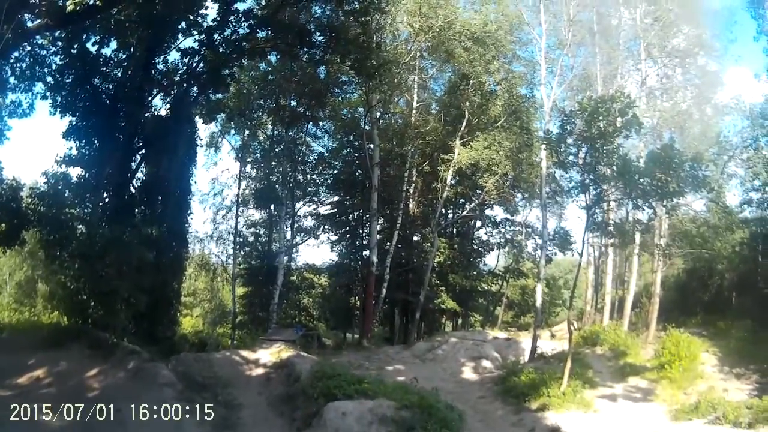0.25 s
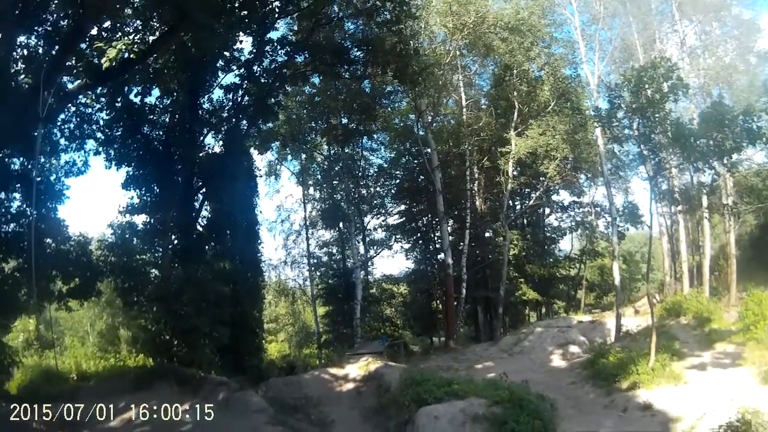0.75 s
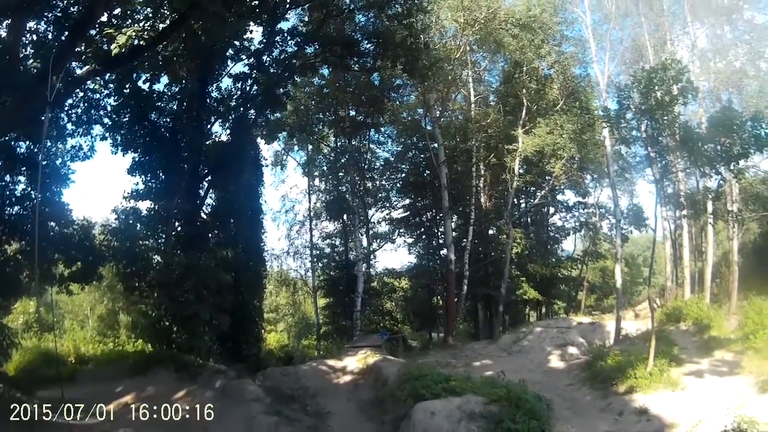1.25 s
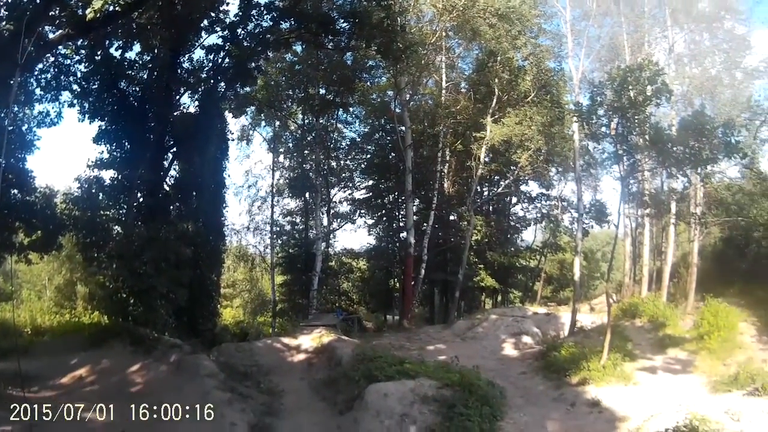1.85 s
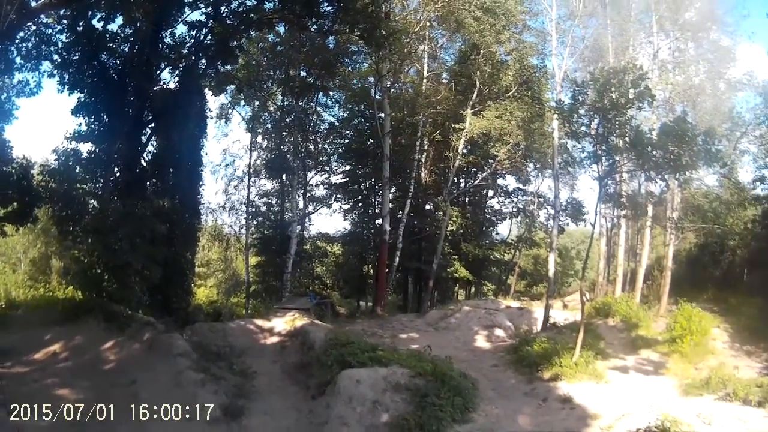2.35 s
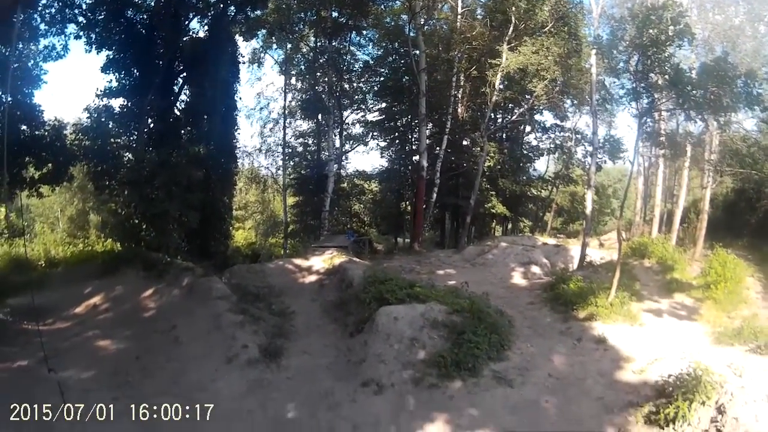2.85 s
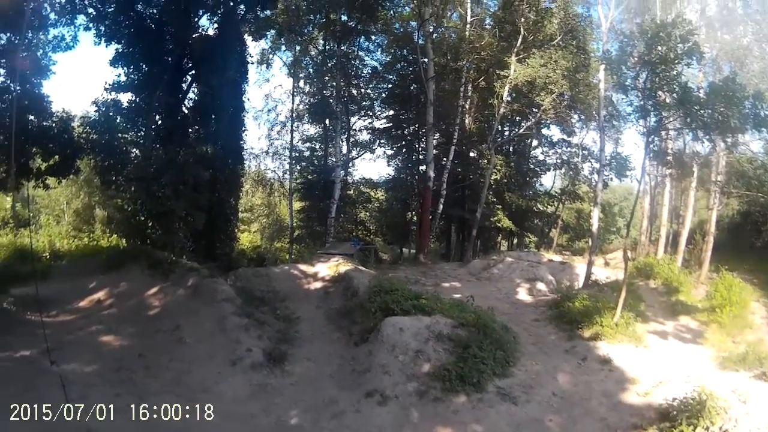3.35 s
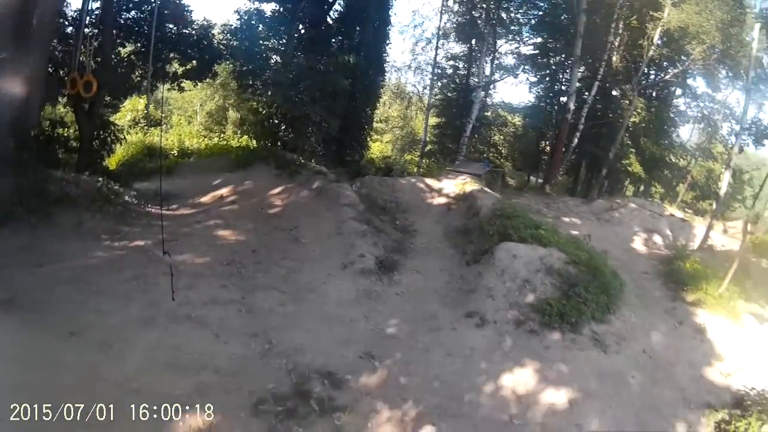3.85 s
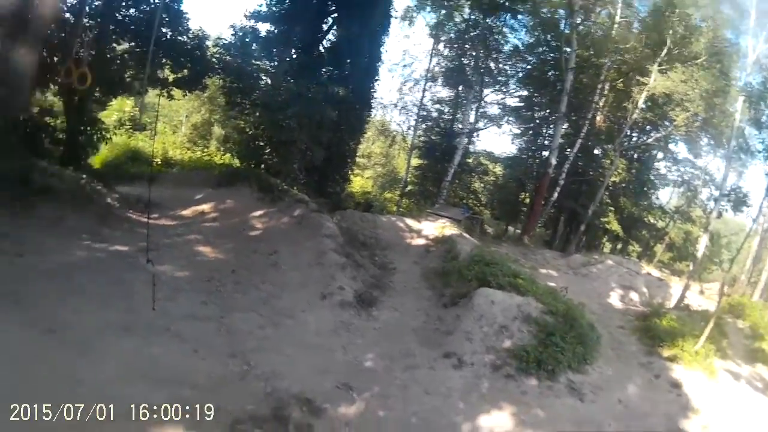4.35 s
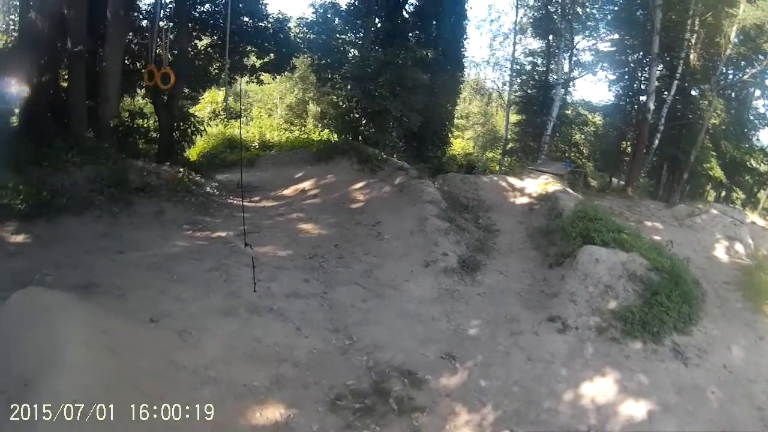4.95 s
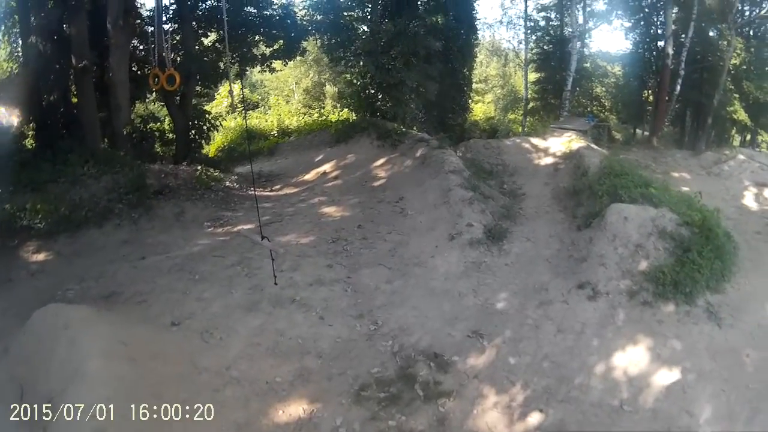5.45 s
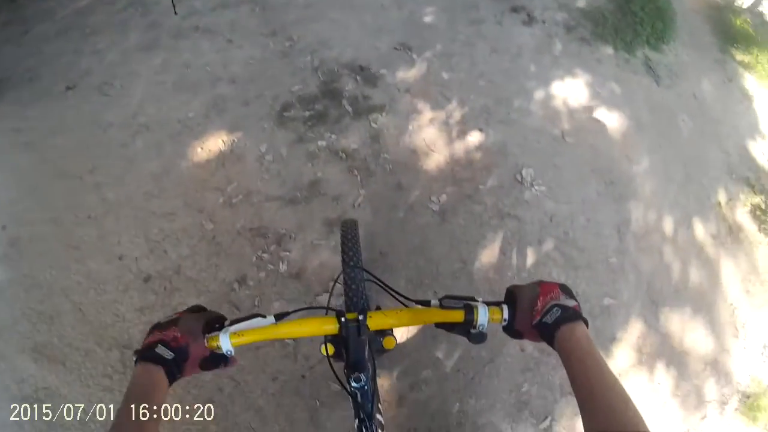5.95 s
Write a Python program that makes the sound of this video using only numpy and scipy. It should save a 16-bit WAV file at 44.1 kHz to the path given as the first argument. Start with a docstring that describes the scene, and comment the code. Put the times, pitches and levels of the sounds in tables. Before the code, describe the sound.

Loose plastic camera housing thumps, knocks, snaps and rubs on its mount in irregular bursts, over thin electronic hiss and very faint birds.

```python
"""Jolts and knocks of a closed plastic helmet housing, microphone inside, while a rider waits astride a bike.
Each movement on this forest trail swings the housing on its mount (low thumps ringing down) and makes its
joints knock, snap and rub: short noisy forces ring the modes of the shell, lumpy pushes sway the mount.
Beneath lie shaped noise and a throbbing tone from the electronics, and a narrow hiss once a second;
far off among the trees a few birds whistle, as short sliding tones."""
import sys
import numpy as np
from scipy import signal
from scipy.fft import rfft, irfft
from scipy.io import wavfile
from scipy.ndimage import uniform_filter1d

SR = 44100
rng = np.random.default_rng(int(sys.argv[2]) if len(sys.argv) > 2 else 0)


def undo_db(level):
    """Turn decibels back into plain size, where 20 dB means ten times bigger."""
    steps = np.asarray(level, float) / 20
    return 10 ** steps


def to_wav(s):
    """Save 16-bit WAV."""
    ch = np.atleast_2d(s).T  # columns
    pcm = np.round(np.clip(ch, -1, 1) * 32767)  # PCM
    wavfile.write(sys.argv[1], SR, pcm.astype(np.int16))


N = 273861   # length in samples

# Movement of the head, as the sway of the mount. Each row: time in seconds, level in dB.
HEAD_MOVEMENT = [(0, -40.5), (0.3, -62), (0.65, -40), (0.88, -46), (1.2, -54.5), (1.35, -46.5),
                 (1.57, -53.5), (1.7, -45), (2.05, -41.5), (2.22, -55), (2.36, -46), (2.901, -63),
                 (3.6, -45.5), (3.78, -53.5), (4.2, -53), (4.36, -41.5), (4.85, -47.5), (5.0, -40.5),
                 (5.3, -49), (5.4, -36), (5.51, -62), (5.649, -46), (6.101, -64.5)]
# Modes of the mount. Each row: frequency in Hz, width in Hz, relative gain in dB.
MOUNT_MODES = [(36, 31, -4), (85, 23.6, -1), (130.4, 33.6, -4.5), (243.7, 38, -14.5)]
# Modes of the plastic shell. Each row: frequency in Hz, width in Hz, relative gain in dB.
SHELL_MODES = [(240.7, 65, 11.5), (573, 144, 7.5), (842, 120, 1), (1364, 305, 6.5), (1933, 262, 3.5),
               (2242, 232, -2.5), (2840, 530, -11.5), (3680, 990, -8), (4820, 1440, -13), (5800, 1430, -17),
               (7800, 770, -29.5), (12000, 2900, -31)]
# Colour of the electronic hiss. Each row: frequency in Hz, relative density in dB per Hz.
HISS_COLOUR = [(150, 14.5), (500, 6.5), (2000, -2.5), (5000, -5.5), (13000, -8), (15500, -11.5)]
# Knocks in the joints. Each row: time in seconds, hollow knock in dB, bright snap in dB, contact length in ms.
JOINT_KNOCKS = [(0.046, -51, -47, 3), (0.27, -53, -58, 5), (0.3958, -23.5, -43, 4.9),
                (0.476, -36, -45, 1.9), (0.4925, -41, -35.5, 10.8), (0.626, -36, -52, 5),
                (0.6374, -37.5, -40.5, 0.51), (0.6786, -18.5, -33, 4.8), (0.7068, -31, -45, 7),
                (0.724, -38, -45, 7.8), (0.7584, -31, -40.5, 0.73), (0.78, -34.5, -44, 2.2),
                (0.8178, -26.5, -40.5, 5.8), (0.845, -28, -40.5, 0.17), (1.107, -47, -60, 2.5),
                (1.1791, -45.5, -66, 2.5), (1.306, -33.5, -60, 9.5), (1.3203, -33.5, -55, 10.2),
                (1.3969, -39.5, -63, 3.1), (1.474, -44.5, -54, 2.7), (1.5025, -42, -64, 3.8),
                (1.605, -16, -35.5, 8.8), (1.6275, -19.5, -59, 5.1), (1.6345, -18.5, -22, 0.93),
                (1.6585, -33.5, -48, 3.6), (1.6985, -37, -33.5, 3.6), (1.709, -44, -43.5, 2),
                (1.7441, -43, -58, 12.6), (1.8697, -42, -54, 7.4), (1.9186, -43, -44, 5.4),
                (1.961, -38.5, -42, 0.63), (2.002, -32, -41, 0.29), (2.021, -41.5, -52, 5.5),
                (2.0867, -27.5, -30.5, 2.4), (2.1102, -34, -31.5, 5.2), (2.1475, -28.5, -42, 1.14),
                (2.3172, -35.5, -35, 8.5), (2.399, -48, -60, 2.2), (2.4666, -42.5, -54.5, 4.7),
                (2.6431, -28.5, -89, 12), (2.654, -31.5, -31.5, 1.2), (2.662, -30, -29, 7.4),
                (2.6792, -32, -39.5, 0.22), (2.7821, -41.5, -50.5, 2.8), (3.1194, -39, -46, 0.44),
                (3.269, -41.5, -51, 3.8), (3.284, -39, -57, 5.7), (3.299, -45.5, -51.5, 3.9),
                (3.3932, -31, -32.5, 2.9), (3.4252, -16.5, -42, 6), (3.5447, -35.5, -39, 1.3),
                (3.567, -27, -43, 24), (3.5794, -30, -45, 3.4), (3.5904, -23, -35, 4.2),
                (3.6248, -26.5, -29.5, 0.43), (3.95, -51, -91, 62), (4.1153, -48.5, -58.5, 12),
                (4.2672, -31, -31, 0.5), (4.2742, -30.5, -48, 1.9), (4.3205, -28.5, -30.5, 5.8),
                (4.3298, -28.5, -39.5, 11.4), (4.372, -24.5, -38.5, 7.9), (4.4772, -27, -36, 4.9),
                (4.5235, -30, -41, 5.3), (4.5388, -29.5, -41.5, 3.2), (4.6258, -20.5, -33.5, 4.1),
                (4.6335, -22.5, -37, 1.75), (4.7146, -32.5, -38, 0.25), (4.7795, -27.5, -37, 3.8),
                (4.786, -22, -35.5, 2.66), (4.8905, -39, -109, 13), (4.9439, -26, -36, 0.77),
                (4.9556, -37, -41.5, 19), (4.9826, -25, -41, 7.2), (5.0381, -11.5, -26.5, 6.1),
                (5.075, -29.5, -43, 16), (5.108, -37.5, -42, 1.1), (5.1478, -40, -41, 2.9),
                (5.1515, -32.5, -34.5, 1.5), (5.2765, -39, -51.5, 8.5), (5.3445, -55, -52, 2),
                (5.3726, -34, -65, 6.8), (5.4079, -34, -48, 0.93), (5.4425, -51, -48, 2.2),
                (5.469, -48, -65, 8.9), (5.5524, -40.5, -60, 2.3), (5.5735, -32, -44.5, 11.5),
                (5.601, -43, -50.5, 4.2), (5.6276, -38.5, -55, 1.1), (5.6562, -39.5, -69, 5.1),
                (5.7619, -32.5, -56, 4.3), (5.7806, -40, -50, 10.4), (5.9538, -23, -35.5, 5.1)]
# Jolts of the housing on its springy mount. Each row: time of the widest swing in seconds, peak level in dB,
# pitch at the widest swing in Hz, time to fall by 60 dB in seconds.
MOUNT_JOLTS = [(0.126, -34.5, 115, 0.14), (0.404, -28, 142, 0.029), (0.478, -20, 73, 0.074),
               (0.591, -26.5, 71, 0.068), (0.691, -31, 135, 0.029), (1.392, -36.5, 102, 0.16),
               (1.516, -33.5, 97, 0.1), (1.615, -13.5, 98.5, 0.14), (1.638, -7, 97, 0.099),
               (1.759, -32, 98, 0.1), (1.945, -28, 109, 0.099), (1.982, -28, 112, 0.029),
               (2.073, -20.5, 97, 0.035), (2.646, -15.5, 179, 0.013), (2.654, -17, 82, 0.077),
               (3.105, -36, 87.5, 0.09), (3.388, -25.5, 100, 0.063), (3.441, -17.5, 92.5, 0.12),
               (3.584, -12, 83, 0.1), (4.276, -15.0, 76.6, 0.11), (4.336, -22.5, 95, 0.15),
               (4.955, -17, 96.3, 0.057), (5.013, -18.5, 82, 0.27), (5.339, -27.5, 93, 0.061),
               (5.384, -30, 94.3, 0.19), (5.96, -26, 91, 0.12)]
# Narrow hiss that the electronics give once a second. Each row: frequency in Hz, width in Hz of each of the
# two resonances in a row, level in dB.
TICK_BANDS = [(11330, 300, -74.5)]
# Far bird notes. Each row: start in seconds, length in seconds, pitch at the end before it wanders in Hz,
# level in dB before the flutter.
BIRD_NOTES = [(2.043, 0.049, 3860, -64), (2.305, 0.11, 3960, -68.5), (3.073, 0.125, 3770, -74),
              (3.448, 0.1, 4000, -69.5), (6.027, 0.046, 2920, -73.5)]

# rubbing and small knocks follow the movement, each by its own share of the movement in dB
MOVE_REFERENCE_DB = -48
RUB_DB, RUB_FOLLOWS = -62, 0.96   # at the reference, before swings and knocks raise it
SMALL_COUNT, SMALL_FOLLOWS = 100, 0.89   # small knocks in all
SMALL_TOP_DB, SMALL_SPREAD_DB = -48, 4.5   # the strongest at the reference; mean fall below that
SMALL_MEAN_SNAP_DB = -8   # snap against knock
HISS_DB = -62.5
WHINE_HZ, THROB_HZ = 9525, 36
WHINE_DB = -77.5   # about which the level wanders
THUD_BELOW_HZ, SNAP_FROM_HZ = 1050, 2400   # the knock proper lies between
JOLT_SAG_PER_S = 2.6   # share of the pitch lost per second
TICK_START_S, TICK_LENGTH_S = 0.452, 0.22


def rms_one(x):
    """Scale to rms 1."""
    return x / np.sqrt(np.mean(x ** 2) + 1e-20)


def at_peak(x, db):
    """Scale so that the strongest two milliseconds swing to the given height."""
    strongest = uniform_filter1d(x ** 2, 88).max()
    return undo_db(db) * x / np.sqrt(2 * strongest + 1e-20)


def add(out, s, piece):
    """Mix a piece in from time s on, cut at the ends of the scene."""
    i = round(s * SR)
    part = piece[max(-i, 0):N - i]
    out[max(i, 0):max(i, 0) + len(part)] += part


def drift(rate):
    """Slow chance with spread 1, from smoothed noise; a higher rate wanders faster."""
    r = np.exp(-80 * np.pi * rate / SR)
    noise = rng.standard_normal(N // 40 + 2002)   # one draw for every 40 samples
    slow = signal.lfilter([1], [1, -2 * r, r * r], noise)[2000:]
    return np.interp(np.arange(N) / 40, np.arange(len(slow)), rms_one(slow))


def resonance(x, hz, width_hz):
    """Two-pole resonance, gain 1 on top."""
    r = np.exp(-np.pi * width_hz / SR)
    top = np.array([1, 0, -1]) * (1 - r * r) / 2
    return signal.lfilter(top, [1, -2 * r * np.cos(2 * np.pi * hz / SR), r * r], x)


def body(x, modes, extra_db=0):
    """A body rings in parallel modes of alternating sign, each with an extra gain."""
    gains = undo_db(np.array(modes)[:, 2] + extra_db)
    return sum((-1) ** k * gains[k] * resonance(x, hz, width) for k, (hz, width, db) in enumerate(modes))


def sway(sway_db):
    """Small pushes that come in lumps keep the mount trembling."""
    push = undo_db(4.2 * drift(15)) * rng.standard_normal(N)
    trembling = body(body(push, MOUNT_MODES), MOUNT_MODES)
    return undo_db(sway_db) * rms_one(trembling)


def rubbing(rub_db):
    """Stick and slip: clumps of tiny contacts over an uneven rustle, heard through the shell."""
    sizes = undo_db(4.0 * np.minimum(rng.exponential(1, N), 4)) * rng.choice([-1, 1], N)
    slips_per_s = 500 * undo_db(6.0 * drift(15))
    slips = sizes * (rng.random(N) < slips_per_s / SR)
    rustle = undo_db(-7 + 6.0 * drift(8)) * rng.standard_normal(N)
    ringing = body(rms_one(slips) + rustle, SHELL_MODES)
    dulled = signal.lfilter([1], [1, -.7], ringing)
    return undo_db(rub_db) * rms_one(dulled)


def hiss():
    """Broad electronic hiss: steady noise shaped in frequency."""
    hz = np.fft.rfftfreq(N, 1 / SR)
    corner_hz, density_db = np.transpose(HISS_COLOUR)
    colour = undo_db(np.interp(np.log(hz + 1), np.log(corner_hz), density_db))
    return undo_db(HISS_DB) * rms_one(irfft(rfft(rng.standard_normal(N)) * colour, N))


def whine():
    """A thin electronic tone, unsteady in level and phase, that throbs."""
    t = np.arange(N) / SR
    tone = undo_db(WHINE_DB + 3.2 * drift(30)) * np.sin(2 * np.pi * WHINE_HZ * t + 1.0 * drift(15))
    throb = 1 + 0.243 * np.cos(2 * np.pi * THROB_HZ * t + 1.0 * drift(2.9))
    return tone * throb


def knocks(contacts):
    """A contact chatters for a few milliseconds and rings the shell; hard contacts reach the high modes."""
    out, ms = np.zeros(N), np.arange(SR // 10) * 1000 / SR
    low = [m for m in SHELL_MODES if m[0] < THUD_BELOW_HZ]
    middle = [m for m in SHELL_MODES if THUD_BELOW_HZ < m[0] < SNAP_FROM_HZ]
    high = [m for m in SHELL_MODES if m[0] > SNAP_FROM_HZ]
    middle_octaves = np.log2(np.array(middle)[:, 0] / middle[0][0])
    high_octaves = np.log2(np.array(high)[:, 0] / high[0][0])
    below_snap = signal.butter(4, SNAP_FROM_HZ, "low", fs=SR, output="sos")
    above_snap = signal.butter(4, SNAP_FROM_HZ, "high", fs=SR, output="sos")
    for s, knock_db, snap_db, length_ms in contacts:
        force = rng.standard_normal(len(ms))
        force = force * np.abs(force)   # uneven touches rather than smooth noise
        strength = rng.standard_normal(len(SHELL_MODES))   # chance gain of each mode
        # the force swells, falls over the contact and leaves a weaker shudder
        swell = 1 - np.exp(-(ms / (0.38 * length_ms)) ** 2)
        shape = swell * (undo_db(-16 * ms / length_ms) + undo_db(-27.0 - 0.93 * ms))
        hardness_db = snap_db - knock_db

        thud = signal.sosfilt(below_snap, body(force * shape, low))
        thud_db = knock_db - 9.0 - 0.12 * hardness_db

        # harder contacts favour the upper of the middle modes
        tilt_db = 1.07 * (hardness_db + 20.5) * middle_octaves
        knock = body(force * shape, middle, tilt_db + 2.0 * strength[:len(middle)])
        knock = signal.sosfilt(below_snap, knock)

        # the harder and shorter the contact, the higher the snap reaches
        reach_hz = np.clip(11000 * 2 ** (0.061 * hardness_db) / length_ms ** 0.075, 4000, 16000)
        edge = signal.butter(3, reach_hz, fs=SR, output="sos")
        glint_db = 0.81 * max(hardness_db, 0) * high_octaves
        snap = body(force * shape ** 1.5, high, glint_db + 2.5 * strength[-len(high):])
        snap = signal.sosfilt(np.vstack([above_snap, edge]), snap)

        hit = at_peak(thud, thud_db) + at_peak(knock, knock_db) + at_peak(snap, snap_db)
        add(out, s - .0012, hit)   # the force begins just ahead of the listed time
    return out


def small_knocks(move_db):
    """Weak contacts at chance moments, stronger while the head moves more; rows as in the joint knocks."""
    place, size, hardness, length = np.transpose(rng.random((SMALL_COUNT, 4)))
    movement_db = SMALL_FOLLOWS * move_db[(place * N).astype(int)]
    knock_db = SMALL_TOP_DB + movement_db - SMALL_SPREAD_DB * np.log(1 / size)
    snap_db = knock_db + 2 * SMALL_MEAN_SNAP_DB * hardness
    length_ms = 1.6 * (0.42 + 1.0 * length)
    return list(zip(place * N / SR, knock_db, snap_db, length_ms))


def jolts():
    """The mount swings up within about half a cycle and rings down, its pitch sagging as the swing fades."""
    out, t = np.zeros(N), np.arange(-SR // 20, SR // 2) / SR   # t = 0 at the widest swing
    for s, db, hz, t60 in MOUNT_JOLTS:
        rise = np.exp(-2.5 * (hz * np.minimum(t, 0)) ** 2)
        fall = undo_db(-60 * np.maximum(t, 0) / t60)
        cycles = hz * (t - JOLT_SAG_PER_S / 2 * t * np.abs(t))
        add(out, s + t[0], undo_db(db) * rise * fall * np.cos(2 * np.pi * cycles))
    return out


def tick_hiss():
    """A short narrow electronic hiss every second: noise through two equal resonances, gated."""
    t = np.arange(N) / SR
    on = uniform_filter1d(1.0 * ((t - TICK_START_S) % 1 < TICK_LENGTH_S), 400)
    noise = rng.standard_normal(N)
    bands = [undo_db(db) * rms_one(resonance(resonance(noise, hz, width), hz, width))
             for hz, width, db in TICK_BANDS]
    return on * sum(bands)


def birds():
    """Short wavering whistles far off among the trees, each sliding down a little and wandering in pitch."""
    out = np.zeros(N)
    for s, length, hz, db in BIRD_NOTES:
        count = round(length * SR)
        pitch = np.linspace(1.04, 1, count) + 0.02 * drift(25)[:count]
        note = np.sin(2 * np.pi * hz * np.cumsum(pitch) / SR)
        flutter = rms_one(signal.lfilter([1], [1, -.97], rng.standard_normal(SR // 4)))[:count]
        add(out, s, undo_db(db) * np.hanning(count) ** .5 * (1.8 + 1.0 * flutter) * note)
    return out


def scene():
    """Everything reaches one microphone; a swinging mount and fresh knocks make the joints rub harder."""
    sway_db = np.interp(np.arange(N) / SR, *np.transpose(HEAD_MOVEMENT))
    move_db = sway_db - MOVE_REFERENCE_DB
    jolt = jolts()
    hits = knocks(JOINT_KNOCKS + small_knocks(move_db))
    # running rms, over about 18 ms and 68 ms
    swing = np.sqrt(uniform_filter1d(jolt ** 2, 800).clip(0))
    shaken = np.sqrt(uniform_filter1d(hits ** 2, 3000).clip(0))
    rub = rubbing(RUB_DB + RUB_FOLLOWS * move_db) * (1 + 30 * swing + 40 * shaken)
    housing = sway(sway_db) + rub + hits + jolt
    electronics = hiss() + whine() + tick_hiss()
    return (housing + electronics + birds())[None]   # one channel


def roll_off(x):
    """The treble ends steeply here."""
    return signal.sosfilt(signal.butter(12, 15830, fs=SR, output="sos"), x)


def record(dry):
    """The mix at the microphone is kept as it arrives, with no change of level or tone beforehand."""
    return roll_off(dry)


dry = scene()
out = record(dry)
to_wav(out)
```